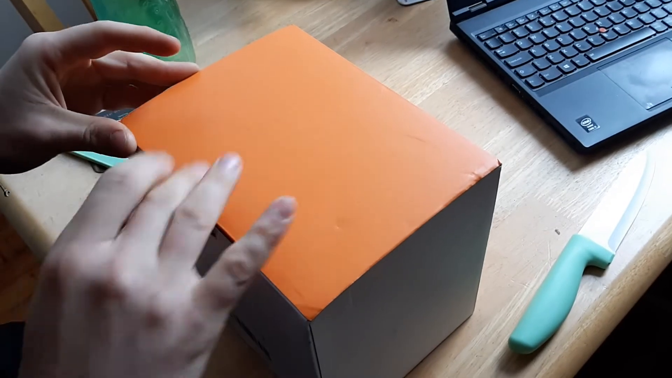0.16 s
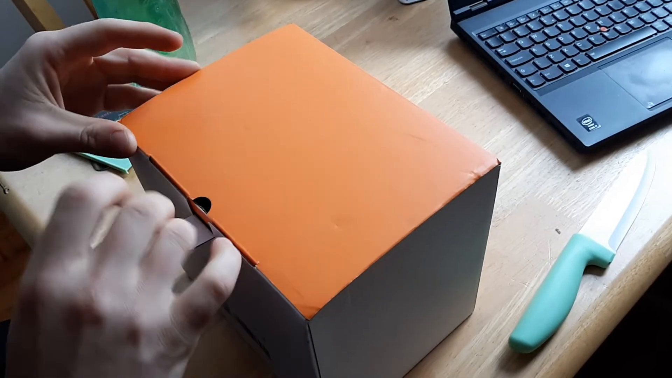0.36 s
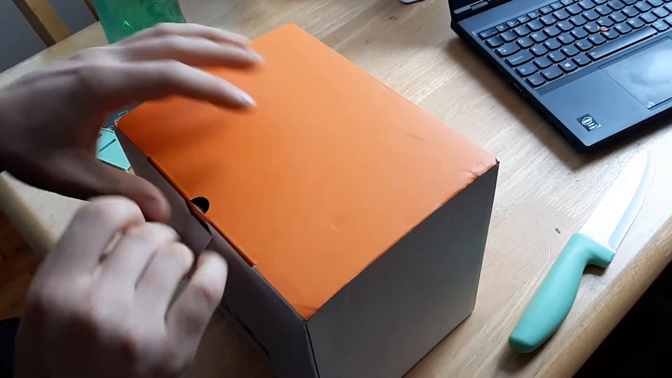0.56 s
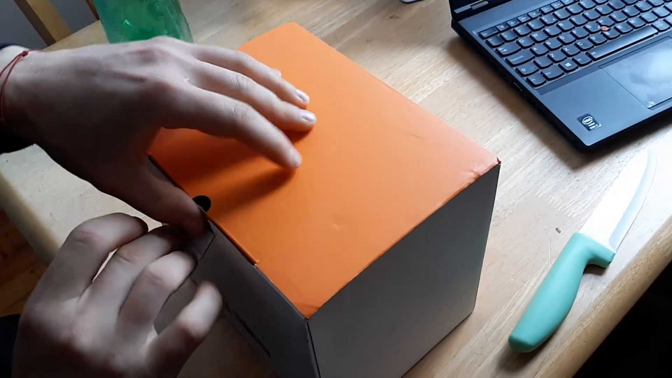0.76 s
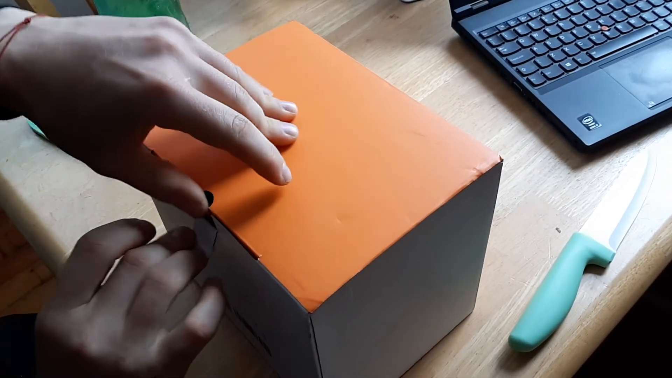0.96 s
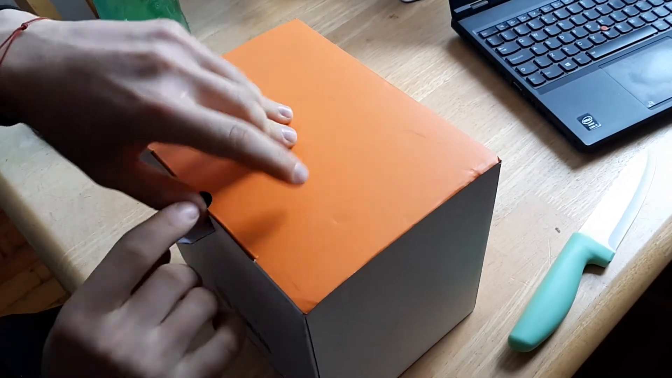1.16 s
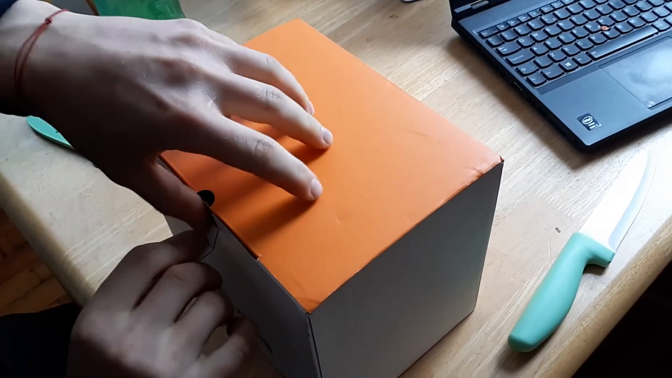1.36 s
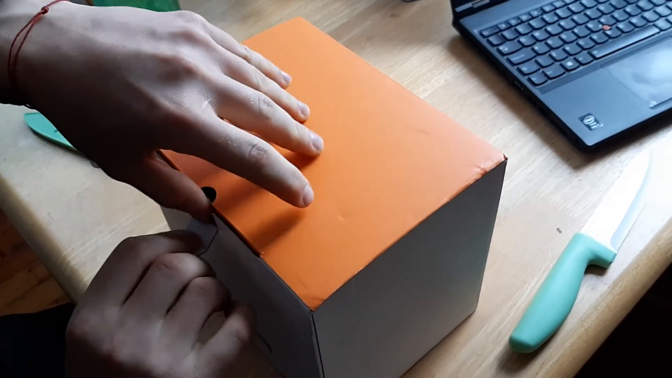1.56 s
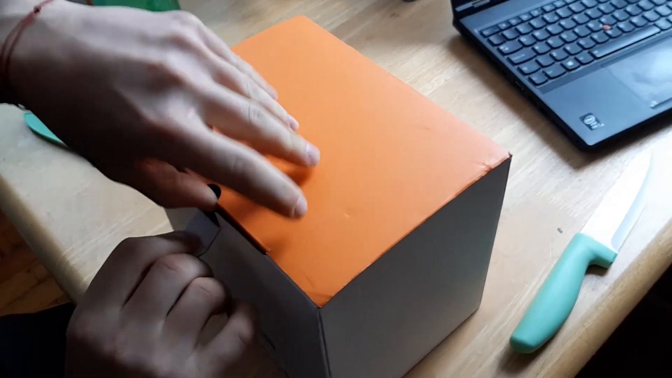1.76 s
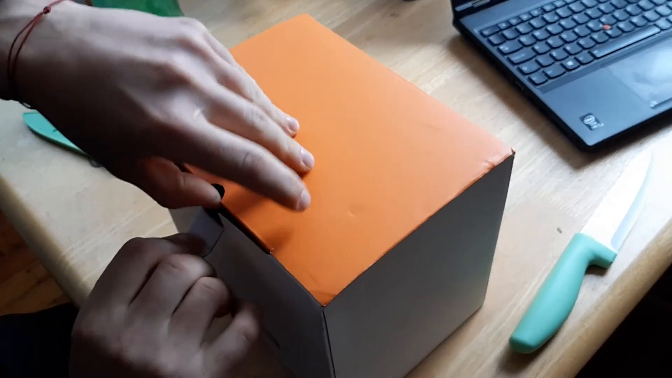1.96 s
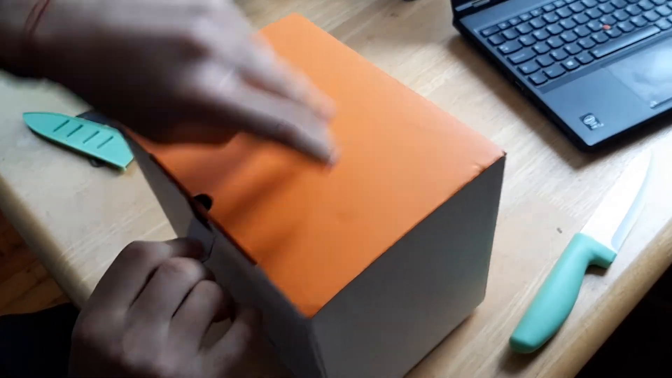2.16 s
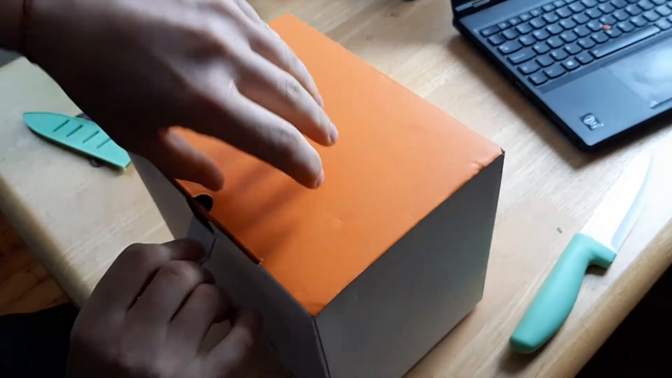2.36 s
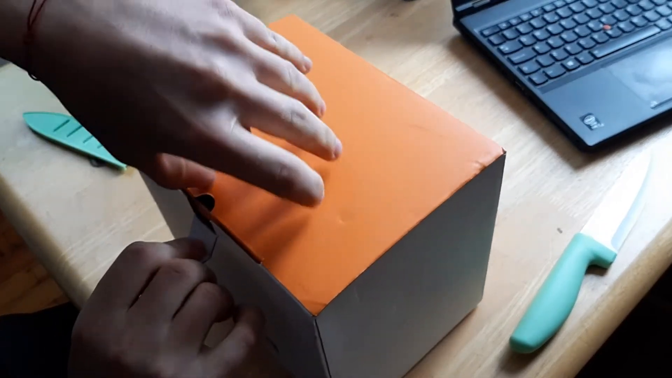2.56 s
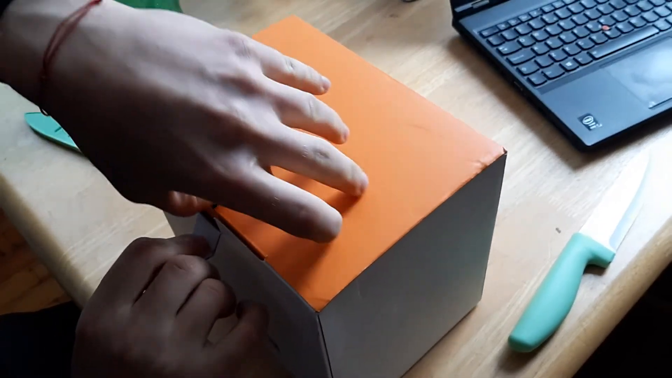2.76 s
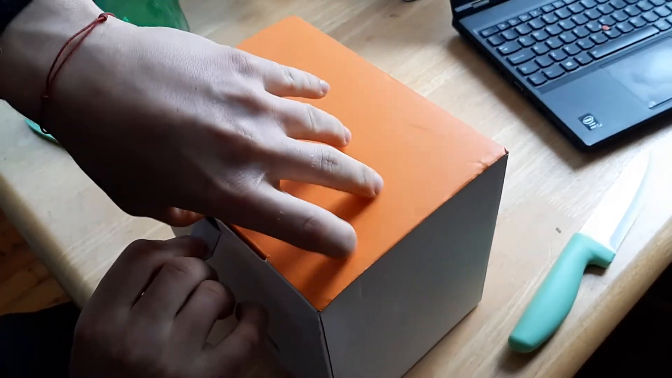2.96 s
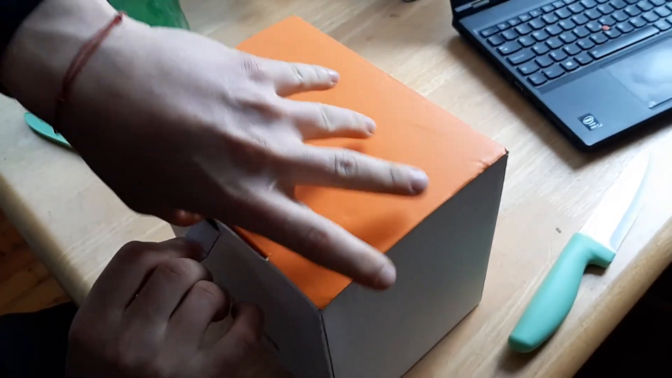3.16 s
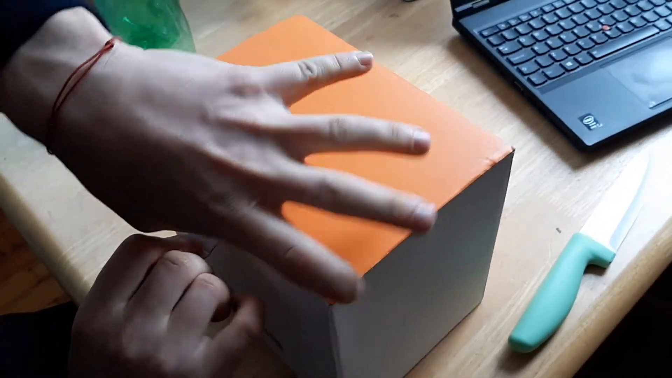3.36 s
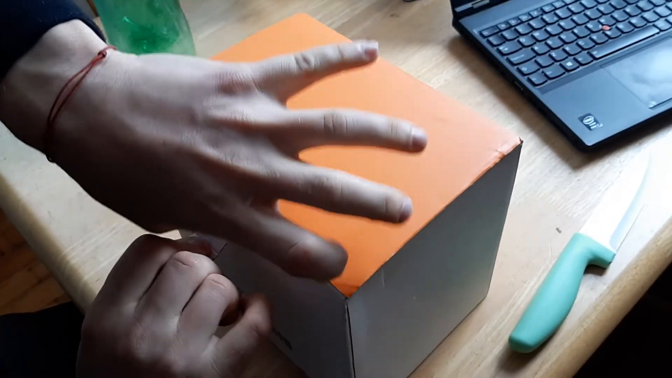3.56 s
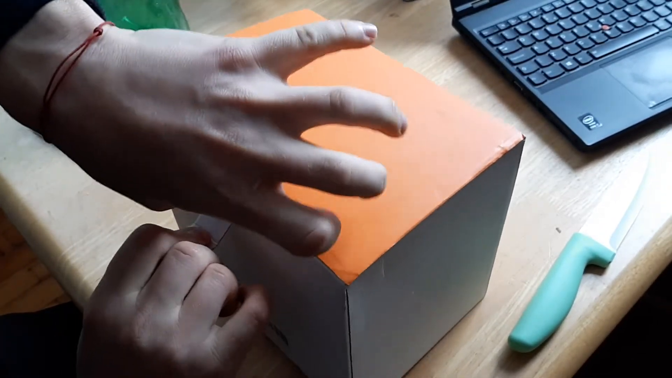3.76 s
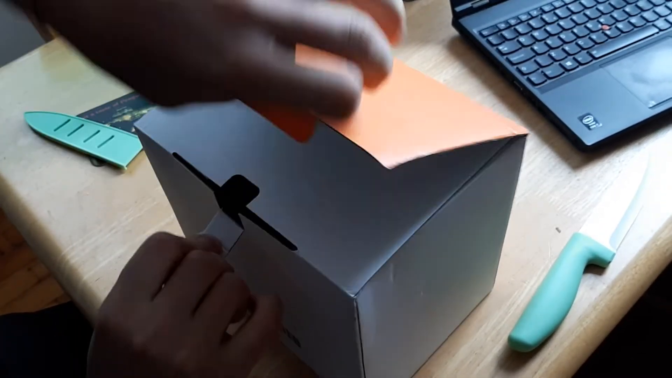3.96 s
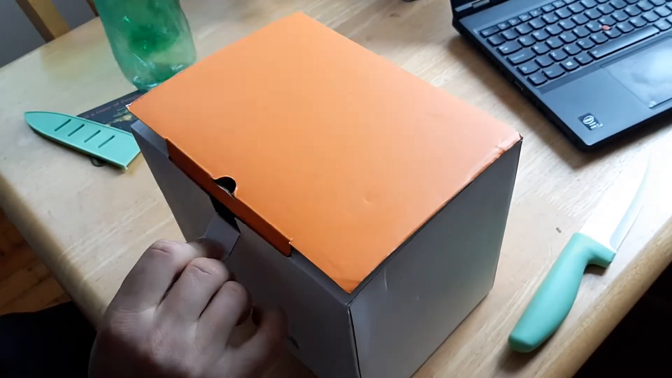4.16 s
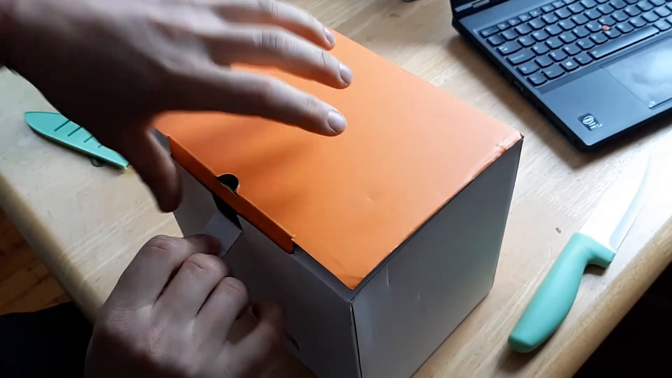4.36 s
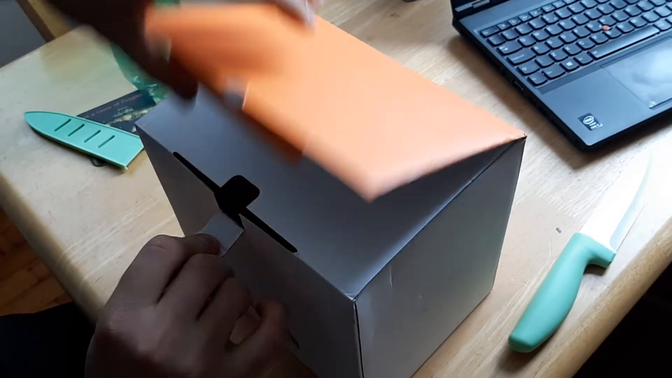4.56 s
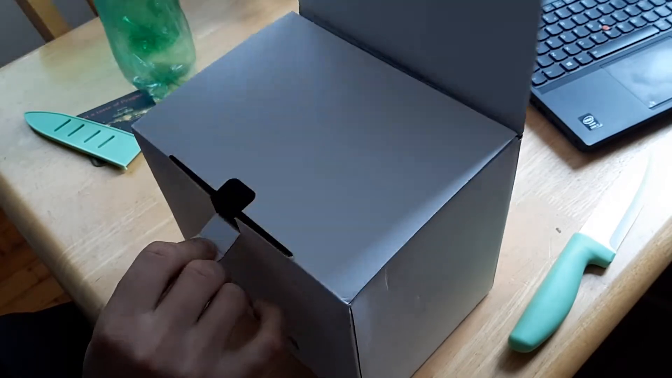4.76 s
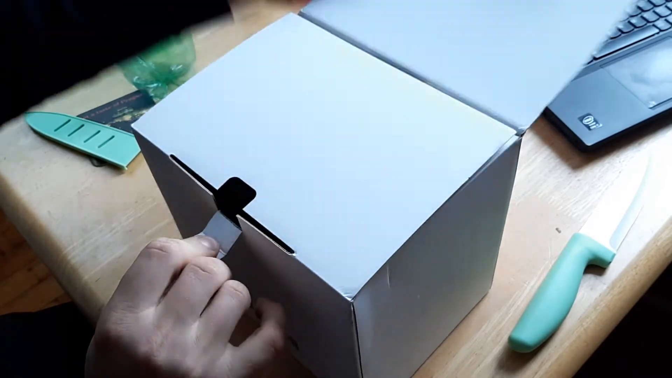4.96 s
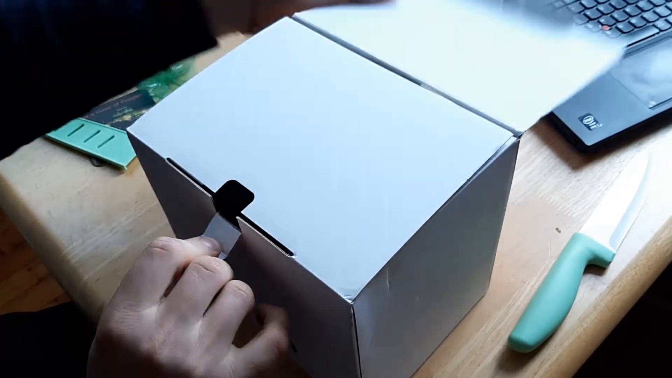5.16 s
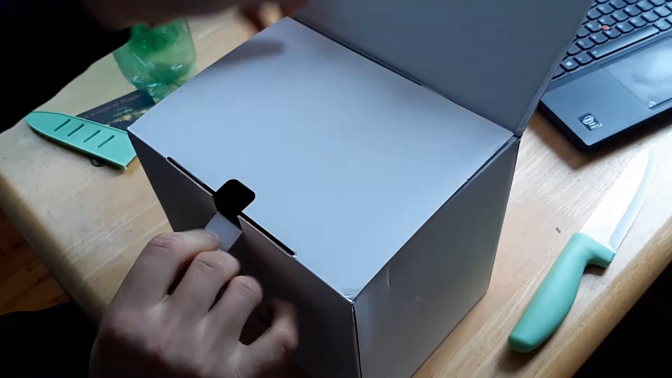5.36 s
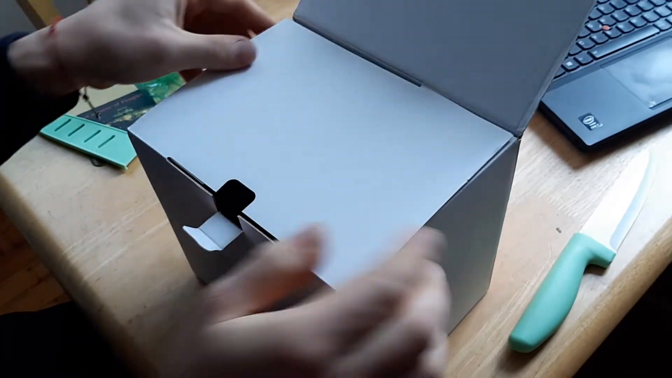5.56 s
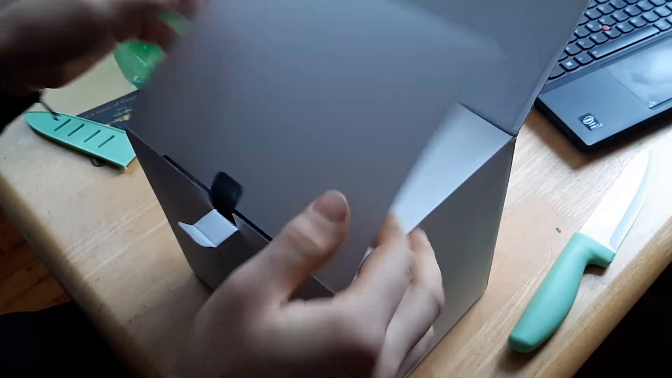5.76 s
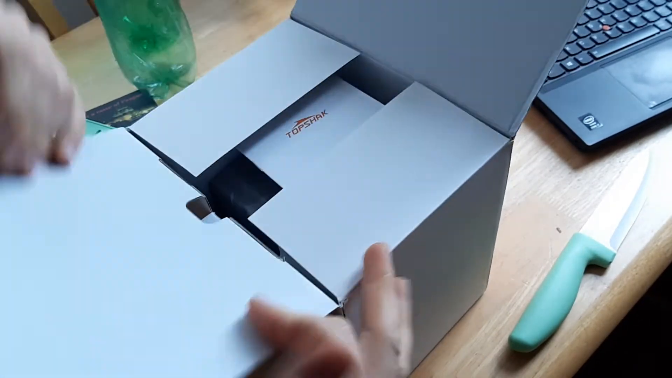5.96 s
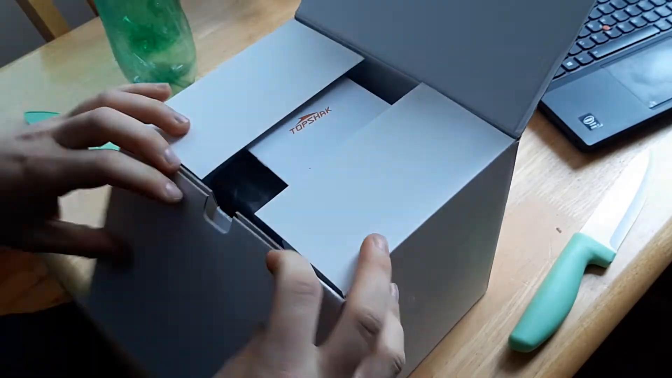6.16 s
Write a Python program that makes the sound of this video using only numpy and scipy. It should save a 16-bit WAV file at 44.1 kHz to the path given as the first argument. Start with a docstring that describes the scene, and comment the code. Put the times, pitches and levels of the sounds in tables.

```python
"""Hands opening a small cardboard box

Fingers knock and slide on the lid of a box on a table in a bare room; the tab cracks loose, the lid pops
up and the flaps fold back. Blows and bumps ring the box and table, creases crack and fizz, the tensed lid
sings, skin rubs as gritty noise and moving air puffs. The room answers with fading noise tails, and a
two-port microphone hisses faintly and turns its gain down on loud blows."""
import sys
import numpy as np
from scipy import signal
from scipy.fft import rfft, irfft, next_fast_len
from scipy.io import wavfile

SR = 44100
rng = np.random.default_rng(int(sys.argv[2]) if len(sys.argv) > 2 else 0)


def generate_wav(sig):
    """Save sig (samples, or channels by samples) to the path in sys.argv[1] as 16-bit PCM at SR."""
    pcm = np.round(np.clip(np.atleast_2d(sig).T, -1, 1) * 32767).astype(np.int16)
    wavfile.write(sys.argv[1], SR, pcm)


def magnitude_from_level(level_db):
    """Linear magnitude for a level in decibels (20 dB per decade)."""
    exponent = np.asarray(level_db, float) / 20
    return 10 ** exponent


N = 273861  # length of the scene in samples

# resonances of the box walls: (centre [Hz], width [Hz], level [dB])
BOX_WALLS = [(187.8, 7.2, -5.5), (265.6, 22, 2.5), (315, 22, -2), (385.4, 22, 3.5), (480, 45, -4.5),
             (597, 210, -7.5)]
# resonances of the table top under the box: (centre [Hz], width [Hz], level [dB])
TABLE_TOP = [(81, 22, -14), (138.7, 11, -0.5)]
# resonances of the struck face, heavily damped: (centre [Hz], width [Hz], level [dB])
STRUCK_FACE = [(663, 333, 0.5), (837, 312, 3)]


def unit(x):
    """Scales a sound to rms 1."""
    return x / np.sqrt(np.mean(x ** 2) + 1e-20)


def along(points, hz):
    """Reads a curve of (frequency [Hz], value) points on a log frequency axis."""
    f, v = np.transpose(points)
    return np.interp(np.log(hz + 1), np.log(f + 1), v)


def filtered(x, response):
    """Multiplies the spectrum of x by a response that is a function of frequency."""
    n = x.shape[-1]
    m = next_fast_len(n + SR // 4)  # spare room for what rings on
    spectrum = rfft(x, m) * response(np.fft.rfftfreq(m, 1 / SR))
    return irfft(spectrum, m)[..., :n]


def coloured(x, spectrum):
    """Gives x a colour, a curve in dB over frequency, at rms 1."""
    return unit(filtered(x, lambda hz: magnitude_from_level(along(spectrum, hz))))


def ringing(x, modes):
    """Sends x through resonances that together answer a single click with energy 1."""
    def body(hz):
        total = 0
        for k, (centre, width, db) in enumerate(modes):
            peak = 1j * hz * width / (centre * centre - hz * hz + 1j * hz * width)
            total = total + (-1) ** k * magnitude_from_level(db) * peak  # neighbours have opposite signs
        return total

    grid_hz = np.fft.rfftfreq(SR, 1 / SR)
    return filtered(x, body) / np.sqrt(np.mean(abs(body(grid_hz)) ** 2))


def paired(pair, alike):
    """Mixes two unrelated signals into left and right with a given likeness (1 = the same)."""
    def shares(hz):
        turn = np.arccos(np.clip(along(alike, hz), -1, 1)) / 2
        return np.array([np.cos(turn), np.sin(turn)])

    mid, side = filtered(pair, shares)
    return np.array([mid + side, mid - side])


def grit(rate, spread_db):
    """Makes noise in short grains of uneven size, rate grains a second."""
    sizes = magnitude_from_level(spread_db * np.minimum(rng.exponential(size=int(N * rate / SR) + 2), 3.5))
    grain = (np.arange(N) * rate / SR).astype(int)
    return unit(rng.standard_normal(N) * sizes[grain])


def burst(length, t, rise=0.32):
    """Makes a quick rise and a gritty decay from an evened-out noise spectrum, energy 1."""
    life = np.clip(length, .0006, .06)
    shape = np.exp(-t / life) * (1 - np.exp(-t / (rise * life)))
    z = rfft(shape * rng.standard_normal(len(t)))
    x = irfft(z / abs(z), len(t)) * np.exp(-t / (4 * life))
    return x / np.linalg.norm(x)


def knocks():
    """Each blow bends one wall, which sounds at once and sets the box ringing; table and face answer too."""
    # fingers and flaps striking the box:
    # (time [s], knock energy [dB], struck wall [Hz], face energy [dB], decay time [s])
    blows = [(.192, -45, 402, -41, .004), (.289, -49, 297, -41.5, 0.0062), (.347, -36, 251, -18.5, 0.0088),
             (.396, -38.5, 314, -27.5, 0.0041), (.741, -46, 323, -54, 0.0023),
             (.812, -43.5, 297, -35.5, 0.0021), (.928, -38, 366, -30, 0.0093),
             (.981, -26.5, 318.6, -22, .018), (1.009, -23.5, 436, -9.5, 0.0047),
             (1.028, -23, 366, -17, 0.0051), (1.049, -31, 272, -21.5, 0.0038),
             (1.201, -30.5, 368, -22, 0.0022), (1.236, -24.5, 323, -13.5, 0.0068),
             (1.255, -36, 364, -24, 0.013), (1.544, -42.5, 283, -32, 0.004),
             (1.733, -43.5, 366, -35.5, .0053), (1.935, -50.5, 370, -43, .0053),
             (2.072, -30.5, 346, -25, 0.0061), (2.116, -20, 327, -12.5, 0.0049),
             (2.17, -35, 302, -28, 0.003), (2.213, -27, 354, -20, 0.0043), (2.392, -37, 325, -26.5, 0.0025),
             (2.842, -51, 315, -31.5, 0.0046), (3.153, -55.5, 378, -38.5, 0.0078),
             (3.17, -51, 412, -31.5, 0.014), (3.201, -43.5, 640, -31.5, 0.0078),
             (3.224, -55.5, 462, -45, .0051), (3.391, -34.5, 328, -20, 0.0045),
             (3.417, -22, 315, -10, 0.0073), (3.435, -36, 308, -13, .013), (3.532, -25, 392, -7, 0.011),
             (3.565, -28, 360, -8, 0.0055), (3.579, -30.5, 301, -8.5, 0.012),
             (3.816, -32, 598, -9.5, 0.0094), (3.837, -10, 293, -6, 0.019), (3.843, -4.5, 326, 1, 0.0037),
             (3.861, -8.5, 253.5, 3, 0.02), (4.086, -40.5, 235, -16.5, 0.0076),
             (4.397, -50.5, 360, -42, 0.0054), (4.554, -43.5, 400, -30, 0.0015),
             (4.788, -45.5, 377, -28, .0033), (5.135, -61.5, 387, -58, 0.01), (5.376, -39, 372, -27, .01),
             (5.395, -29, 383, -22, 0.0092), (5.45, -37.5, 241, -21.5, 0.0029),
             (5.624, -43, 417, -26, 0.0023), (5.637, -32.5, 196, -30, 0.01), (5.761, -35, 210, -26, 0.0096),
             (5.869, -47.5, 383, -41, 0.013), (6.02, -35.5, 466, -19.5, 0.0084),
             (6.057, -24.5, 432, -15, .0023)]
    # the box rocks and bumps the table: (time [s], energy [dB])
    bumps = [(0.29, -55), (.812, -57), (1.049, -46.5), (1.255, -36), (2.17, -40.5), (2.213, -45.5),
             (2.392, -52), (2.842, -51.5), (3.579, -44.5), (3.837, -16.5), (3.86, -12.5), (4.086, -39.5),
             (4.789, -39), (5.376, -49), (5.395, -45.5), (5.625, -33), (5.636, -32.5), (5.745, -38.5),
             (5.761, -40), (5.871, -48), (6.058, -34.5)]
    through_db = -24.5  # share of a knock that reaches the table
    pushes = np.zeros((3, N + SR))  # on box, table and face
    t = np.arange(SR // 5) / SR
    thump = t * np.exp(-t / 0.00097)
    thump = thump / np.linalg.norm(thump)
    for s, knock_db, wall_hz, face_db, length in blows:
        bend = np.sin(2 * np.pi * wall_hz * t) * np.exp(-t / np.clip(length, .001, .03))
        forces = [bend / np.linalg.norm(bend), thump, burst(length, t, rise=.4)]
        levels = magnitude_from_level([[knock_db], [knock_db + through_db], [face_db]])
        pushes[:, round(s * SR):][:, :len(t)] += levels * forces
    for s, db in bumps:
        pushes[1, round(s * SR):][:len(t)] += magnitude_from_level(db) * thump
    bodies = (BOX_WALLS, TABLE_TOP, STRUCK_FACE)
    rings = sum(ringing(push[:N], body) for push, body in zip(pushes, bodies))
    return rings + magnitude_from_level(11.5) * pushes[0, :N]  # the bending wall itself, heard at once


def snaps():
    """Each crease cracks around its own pitch and sheds a slower fizz of fibres."""
    # card creasing and tab clicks, sharpness held within 0.7 to 12:
    # (time [s], crack energy [dB], crack pitch [Hz], fizz energy [dB], sharpness [Q])
    creases = [(.194, -33.5, 1380, -29, 3.2), (0.3457, -31, 1290, -18, 1.1), (.399, -29, 1830, -25, 9.8),
               (.5624, -33.5, 4700, -39, 3.4), (0.958, -31, 1630, -20.5, 2.3),
               (0.9848, -38, 1940, -29, 2.5), (0.9987, -32, 1000, -14, 1.8), (1.003, -34, 1780, -4.5, 3.8),
               (1.011, -8, 1760, -30, 9.2), (1.03, -19.5, 1100, -31, 3.5), (1.0515, -23, 1820, -8.5, 5.5),
               (1.2622, -20.5, 1480, -13.5, 4), (1.357, -49, 5000, -25, 2.5),
               (1.3794, -39.5, 1100, -35, 2.5), (1.717, -31, 3960, -52, 2.2), (1.738, -24, 3560, -48, 2.8),
               (2.1178, -5.5, 4430, -4.5, 1.4), (2.1224, -12, 1830, -21, 3), (2.2159, -19, 950, -13.5, 5.8),
               (2.3924, -26, 1040, -23, 1.9), (2.8454, -37, 1920, -23, 2.5), (3.3288, -38, 2500, -29, 1.1),
               (3.3412, -26.5, 3330, -25, 8.6), (3.4168, -9.5, 965, -6, 1.2), (3.4348, -12.5, 3120, -7, 5),
               (3.5291, -4.5, 3160, 2.5, 1.1), (3.5514, -3, 3820, -8, 12), (3.5632, -14, 1210, -11.5, 5.5),
               (3.5816, -4.5, 1200, 1, 5), (3.589, -2, 1720, -8.5, .83), (3.753, -22.5, 3000, -37, 1.2),
               (3.8139, -4.5, 2000, -11.5, 1.3), (3.8208, -8, 1300, -3.5, 8.8),
               (3.8297, -16, 1230, -2.5, 2.1), (3.8382, 11.5, 2100, 12.5, 1.4),
               (3.8434, 2.5, 1870, 4.5, 1.3), (3.8531, 3.5, 3560, 10, 1.6), (3.8679, -7.5, 1955, -2, 5),
               (4.0862, -11.5, 1850, -8.5, 0.86), (4.3839, -42, 1500, -38.5, 1.1),
               (4.399, -37, 980, -39, 2.8), (4.4643, -24.5, 2720, -37.5, 6),
               (4.5503, -19.5, 1800, -15, 1.4), (4.7671, -36.5, 1150, -28.5, 2.1),
               (4.7761, -24, 5450, -19, 5.4), (4.7881, -13, 3970, -15, 6),
               (5.3706, -28.5, 1370, -20.5, 3.5), (5.4147, -37, 970, -25.5, 2.2),
               (5.455, -19.5, 1600, -29, 1), (5.6204, -20.5, 1240, -18.5, 0.62),
               (5.645, -19.5, 2920, -30, 2.2), (5.7474, -24.5, 1170, -13, 1.6),
               (5.7647, -18, 1060, -27, 2.5), (5.8714, -32.5, 1140, -17.5, 2.5),
               (6.0202, -15.5, 1450, -12, 0.56), (6.038, -13.5, 1440, -9, 1.6),
               (6.0604, -10, 1810, -15, 0.58), (6.071, -25, 2450, -10, 2.3), (6.12, -16, 2120, -19, 6.5)]
    # colour of the surface fibres: (frequency [Hz], level [dB per Hz])
    fibres = [(2500, -5.5), (4500, 1.5), (6000, -2), (9000, -3), (12000, 0.5), (16000, -3)]
    crack_s, fizz_s = 0.0015, 0.0037  # decay times
    out = np.zeros(N + SR)
    t = np.arange(SR // 5) / SR
    for s, crack_db, pitch_hz, fizz_db, sharpness in creases:
        peak = signal.iirpeak(pitch_hz, np.clip(sharpness, .7, 12), SR)
        crack = signal.lfilter(*peak, burst(crack_s, t))
        crack = crack / np.linalg.norm(crack)
        fizz = coloured(burst(fizz_s, t, rise=0.33), fibres) / np.sqrt(len(t))  # energy 1
        out[round(s * SR):][:len(t)] += magnitude_from_level(crack_db) * crack + magnitude_from_level(fizz_db) * fizz
    return out[:N]


def creaks():
    """The tab slips in step with the tensed lid and makes it sing."""
    # slips of the tab: (time [s], level [dB], decay time [s])
    slip_times = [(3.416, -40.5, 0.0068), (3.55, -27, 0.0067), (3.564, -32, 0.0041), (3.584, -15.5, 0.0019),
                  (3.584, -21, 0.012), (3.849, -19.5, 0.0064), (4.547, -46.5, 0.0037), (5.749, -45, 0.0036),
                  (5.764, -37, 0.0024)]
    # the tensed lid, whose close pair beats: (centre [Hz], width [Hz], level [dB])
    lid = [(818, 9, -1), (873, 11.1, 0.5), (1150, 17, -8.5), (1720, 18, -3.5)]
    pushes = np.zeros(N + SR)
    t = np.arange(SR // 5) / SR
    for s, db, length in slip_times:
        turn = 2 * np.pi * 838 * (t + round(s * SR) / SR)  # 838 Hz
        tone = np.sin(turn) + np.sin(2 * turn) / 4  # with a weak octave
        slips = tone * t * np.exp(-t / np.clip(length, .001, .03))
        slips = slips / np.linalg.norm(slips)
        pushes[round(s * SR):][:len(t)] += magnitude_from_level(db) * (slips + 3.8 * burst(length, t))
    return ringing(pushes[:N], lid) + magnitude_from_level(8.5) * pushes[:N]


def rubbing():
    """Skin and card slide in small slips that rasp and hiss; their weight rubs the face and rumbles in the box."""
    # strokes of skin and card, rise and fall being 0.005 s at least: (fastest moment [s],
    # time to rise 20 dB [s], time to fall 20 dB [s], slide [dB], weight on the box [dB])
    strokes = [(.21, 0.11, 0.07, -85, -61), (.33, 0.16, 0.3, -64.5, -66.5), (.67, 0.06, 0.1, -58, -60.5),
               (.74, 0.17, 0.57, -61.5, -63.5), (.95, -0.03, 0.6, -63, -50.5), (1.02, 0.2, .1, -48, -64),
               (1.14, -0.36, 0.56, -66.5, -61), (1.258, 0.0457, 0.2169, -51, -46),
               (1.45, -0.27, 0.26, -60.5, -59.5), (1.56, -0.1, 0.27, -64, -56.5),
               (1.8, 0.48, .1, -59, -67.5), (2.13, 0.0437, 0.1159, -43, -70),
               (2.3, 0.73, 0.27, -64.5, -69.5), (2.848, -0.16, 0.19, -54.5, -60.5),
               (3.22, -0.1, 0.6, -88.5, -64.5), (3.438, 0.0669, 0.0637, -34, -61),
               (3.529, 0.005, 0.15, -32, -48), (3.67, 0.16, -0.04, -44.5, -54),
               (3.83, 0.07, 0.1532, -38, -46.5), (4.0, 0.23, 0.05, -51, -48), (4.1, 0.08, 0.0254, -58, -45),
               (4.4, -0.1, 0.5, -62, -68.5), (4.458, -0.18, 0.1, -46, -55), (4.58, .05, 0.13, -68, -55.5),
               (4.7, 0.04, 0.4, -55.5, -83), (4.8, -0.12, 0.25, -65, -56), (4.89, 0.1, 0.19, -50, -78),
               (5.151, .12, 0.05, -48.5, -82), (5.375, 0.06, 0.4, -51.5, -63.5),
               (5.56, 0.14, -0.15, -55, -65.5), (5.63, 0.04, 0.5, -56, -57), (5.764, 0.07, 0.07, -41, -65),
               (5.97, 0.1, -4, -65, -68), (6.031, 0.06, .1, -36, -61), (6.07, 0.1166, 0.17, -38, -49.5),
               (6.15, 0.16, .2, -50.5, -60)]
    # colour of the rasp: (frequency [Hz], level [dB per Hz])
    rasp_colour = [(400, -29.5), (1000, -2.5), (1800, -0.5), (2800, -7.5), (4500, -4), (6500, -18),
                   (9000, -10.5)]
    # hiss of sliding skin: (frequency [Hz], level [dB per Hz])
    skin = [(1500, -10.5), (2500, -6.5), (4500, -0.1), (6000, -2.5), (9000, -1.5), (12000, 3.5), (16000, 2)]
    rasp_db = -6  # under the mean of slide and weight
    muffled_db = -14  # rub of the face, under the weight
    t = np.arange(0, N + 64, 64) / SR
    slide, weight = np.zeros((2, 1))
    for s, rise, fall, slide_db, weight_db in strokes:
        shape = magnitude_from_level(-20 * np.maximum((s - t) / max(rise, .005), (t - s) / max(fall, .005)))
        slide = np.hypot(slide, magnitude_from_level(slide_db) * shape)
        weight = np.hypot(weight, magnitude_from_level(weight_db) * shape)
    slide, weight = (np.interp(np.arange(N) / SR, t, curve) for curve in (slide, weight))
    slips = grit(500, spread_db=3)
    rasp = magnitude_from_level(rasp_db) * np.sqrt(slide * weight) * coloured(slips, rasp_colour)
    hiss = slide * coloured(slips, skin)
    muffled = magnitude_from_level(muffled_db) * unit(ringing(grit(130, spread_db=6.5), STRUCK_FACE))
    rumble = unit(ringing(grit(60, spread_db=5), BOX_WALLS + TABLE_TOP))
    return rasp + hiss + weight * (muffled + rumble)


def puffs():
    """A swinging flap pushes air at the microphone: one slow push and pull, with no echo."""
    # puffs: (time [s], level [dB], decay time [s])
    pushes = [(1.259, -47, 0.0068), (2.129, -25, 0.006), (3.389, -31, 0.011), (3.831, -6, 0.016),
              (4.787, -29.5, 0.0069), (5.627, -29.5, 0.0073), (6.066, -26.5, 0.0042)]
    out = np.zeros(N + SR)
    t = np.arange(SR // 5) / SR
    for s, db, length in pushes:
        u = t / np.clip(length, .002, .03)
        out[round(s * SR):][:len(t)] += magnitude_from_level(db) * u * (2 - u) * np.exp(-u)
    return out[:N]


def room(x, piece=8192):
    """Each stretch of piece samples gets its own tail of fading noise, since the hands keep moving."""
    # time the room takes to fade by 60 dB: (frequency [Hz], time [s])
    fade = [(120, 0.38), (300, 0.34), (800, 0.33), (2000, 0.32), (6000, 0.3), (14000, 0.19)]
    # left-right likeness of the tail: (frequency [Hz], likeness [0-1])
    tail_alike = [(60, 0.9), (200, 0.98), (500, 0.39), (1000, 0.067), (2500, .03)]
    out = np.zeros((2, N + SR))
    for at in range(0, N, piece):
        hz, t, z = signal.stft(rng.standard_normal((2, SR * 2 // 3)), SR, nperseg=256)
        fading = z * magnitude_from_level(-60 * t / along(fade, hz)[:, None])
        tail = signal.istft(fading, SR, nperseg=256)[1]
        onset = 1 - np.exp(-np.arange(tail.shape[1]) / SR / 0.00045)
        tail = paired(tail * onset, tail_alike)
        wet = signal.fftconvolve(x[None, at:at + piece], tail / np.linalg.norm(tail[0]), axes=1)
        out[:, at:at + wet.shape[1]] += wet
    return out[:, :N]


def scene():
    """The box sits a little to the left and reaches the left port first; the walls answer a moment later."""
    # strength of the room's answer: (frequency [Hz], level [dB])
    answer = [(100, -4.5), (400, -4.5), (1500, -2.5), (6000, -3.5), (14000, 0)]
    ports_s, walls_s = .00012, 0.0066  # delay between the ports, delay of the walls
    box = snaps() + knocks() + rubbing()
    song = creaks()
    direct = filtered(box + song, lambda hz: np.exp(np.outer([1j, -1j], np.pi * hz * ports_s)))
    to_walls = filtered(box + 0.65 * song,
                        lambda hz: magnitude_from_level(along(answer, hz)) * np.exp(-2j * np.pi * hz * walls_s))
    near = (direct + puffs()) * magnitude_from_level([[.9], [-.9]])  # left and right, dB
    return near + room(to_walls) * magnitude_from_level([[.7], [-.7]])


def hush():
    """Room tone and microphone hiss: steady coloured noise, partly shared by left and right."""
    # colour of the hush: (frequency [Hz], level [dB per Hz])
    hush_colour = [(18, -44.5), (30, -15), (131, 0.5), (295, -9.5), (374, -14.5), (616, -15), (2750, -18.5),
                   (3980, -12.5), (7470, -26), (10800, -14.5), (15700, -11.5), (16000, -46)]
    # left-right likeness of the hush: (frequency [Hz], likeness [0-1])
    hush_alike = [(130, .7), (400, .5), (1400, 0.034)]
    noise = coloured(rng.standard_normal((2, N)), hush_colour)
    return magnitude_from_level(-63.5) * paired(noise, hush_alike)


def turned_down(x):
    """Gain drops fast on loud sound and creeps back at a steady rate."""
    step = 256  # samples in each look at the peaks
    peaks = abs(x).max(0)[:N // step * step].reshape(-1, step).max(1)
    peaks_db = 20 * np.log10(peaks + 1e-9)
    over_db = 0.12 * np.clip(peaks_db + 15, 0, None)  # cut asked for by peaks above -15 dB
    creep_db = 11.8 * np.arange(len(over_db)) * step / SR  # dB regained since the start
    cut_db = np.maximum.accumulate(over_db + creep_db) - creep_db
    return x * magnitude_from_level(-np.interp(np.arange(N), np.arange(len(cut_db)) * step, cut_db))


def low_pass(x):
    """Removes everything above the highest recorded frequency."""
    return signal.sosfilt(signal.butter(12, 16500, fs=SR, output="sos"), x)


def record(dry):
    """The microphone colours the scene, adds its hush, turns its gain down and clips at full scale."""
    # colour of the microphone: (frequency [Hz], level [dB])
    mic = [(40, -28), (110, 2.5), (5800, 7), (7500, -10.5), (9500, -6), (12500, -6), (15700, -3.5),
           (16000, -40)]
    noise = hush()
    heard = filtered(dry, lambda hz: magnitude_from_level(along(mic, hz))) + noise
    mix = np.clip(turned_down(heard), -1, 1)
    return low_pass(mix)


dry = scene()
out = record(dry)
generate_wav(out)
```